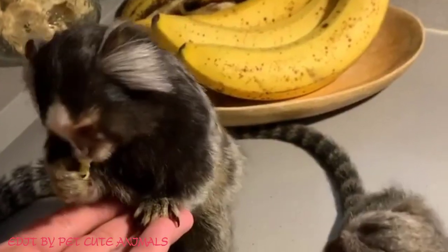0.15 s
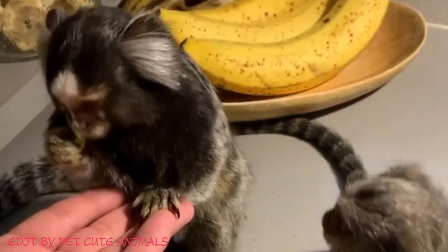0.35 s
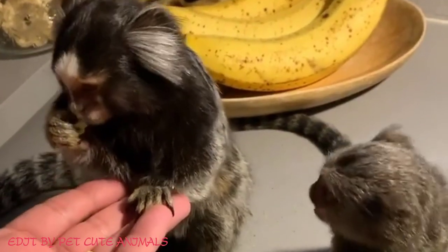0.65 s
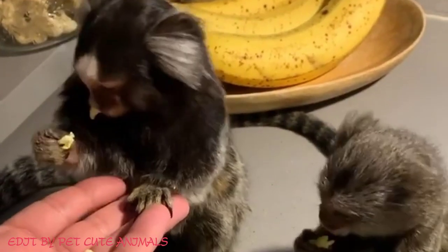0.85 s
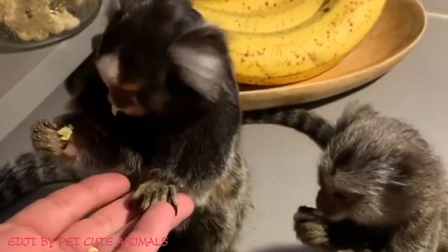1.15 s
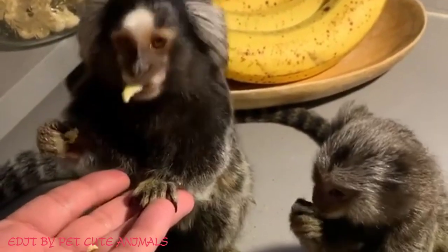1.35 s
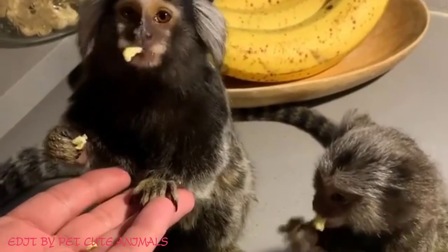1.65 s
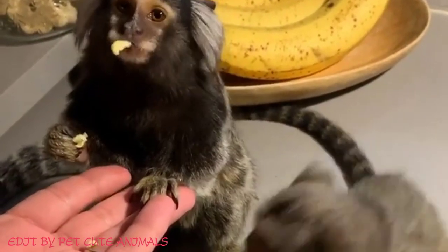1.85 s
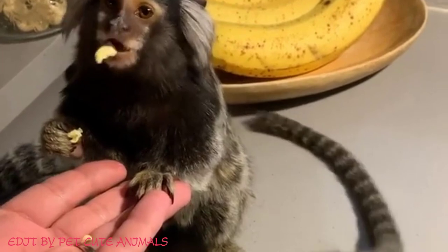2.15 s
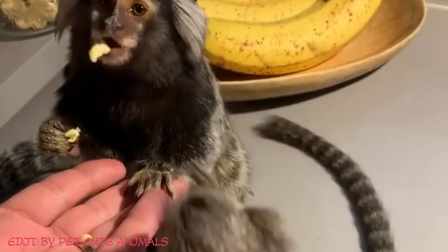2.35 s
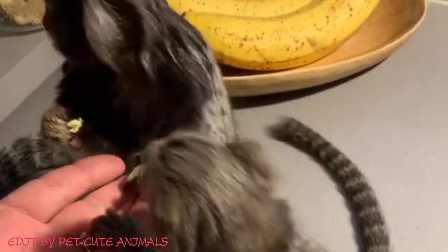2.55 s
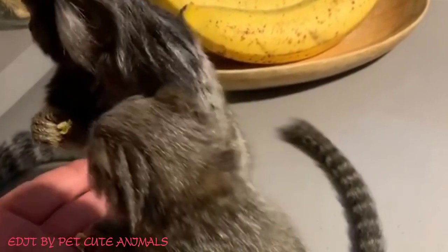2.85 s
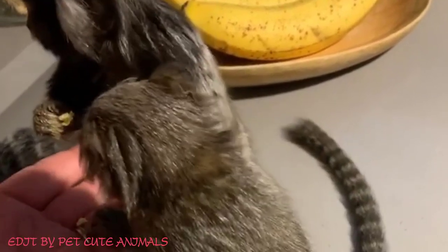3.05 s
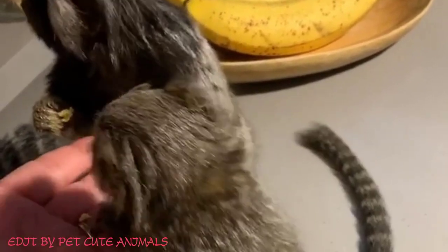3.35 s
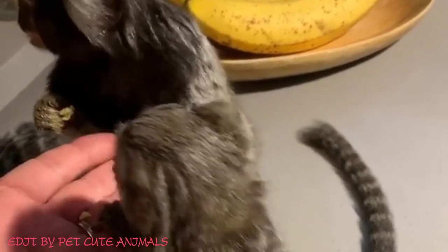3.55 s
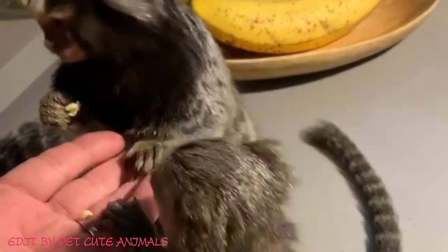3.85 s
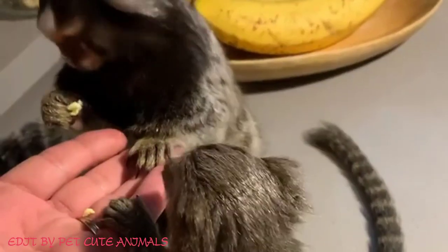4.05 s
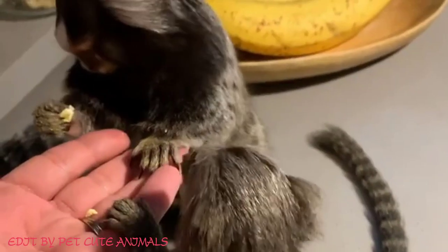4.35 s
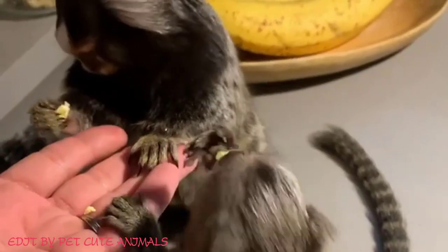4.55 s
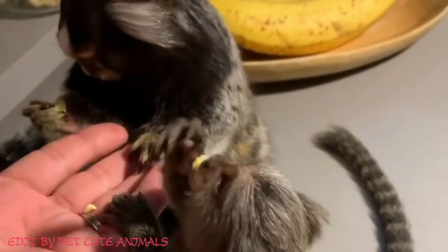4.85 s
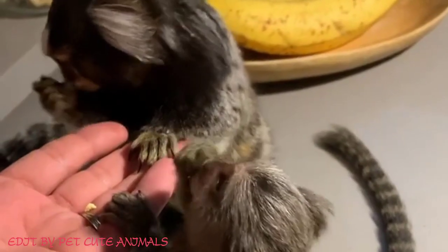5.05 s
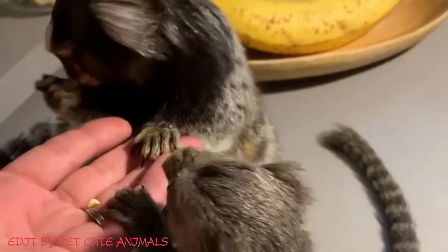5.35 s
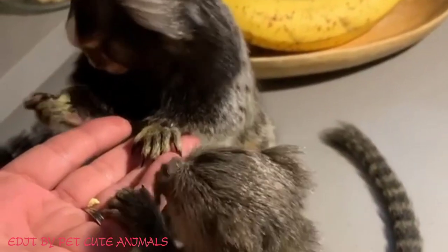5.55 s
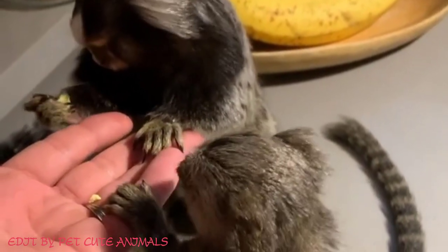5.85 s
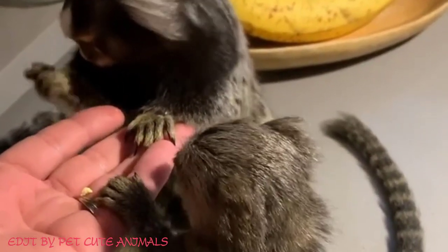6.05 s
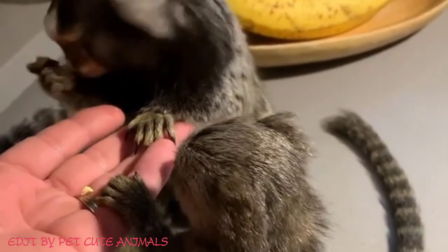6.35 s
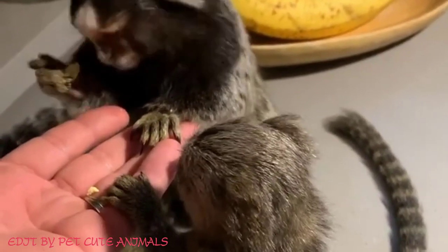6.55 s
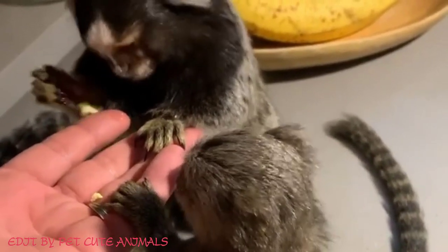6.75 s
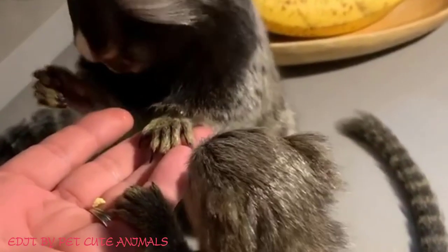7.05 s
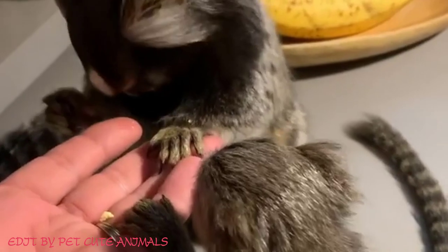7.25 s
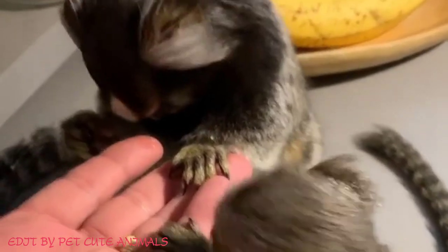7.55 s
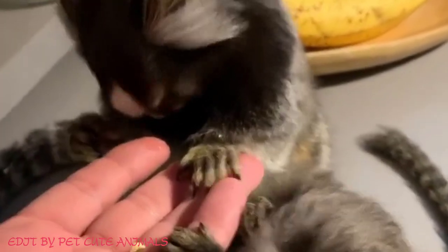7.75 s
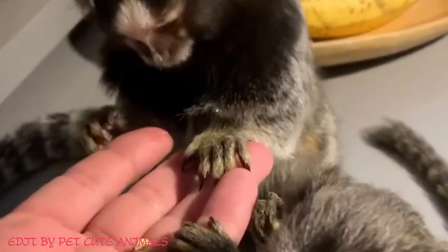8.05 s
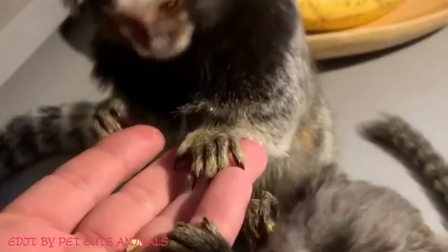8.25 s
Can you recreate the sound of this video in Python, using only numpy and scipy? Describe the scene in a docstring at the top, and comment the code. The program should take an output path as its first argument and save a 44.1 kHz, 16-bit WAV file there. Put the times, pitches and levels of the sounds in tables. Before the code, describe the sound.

A close stereo microphone in a small kitchen catches two tiny monkeys eating. Irregular chewing runs throughout: delicate noisy clicks, moist lip smacks, faint squelches and dry, crisp snaps, the sharpest snap near 4.4 s. Beneath lie a low, wavering appliance hum, a very faint motor whine, soft rumble and airy rushing, with a hollow drone that fades. At about 0.45 s comes a short, extremely high whistle, its pitch fluttering rapidly around 8 to 10 kHz. At 2.2 s a quick soft, hollow thump shakes the counter, followed at once by a stronger warbling chirp at 2.3 s and a longer, weaker one at 2.75 s. A very brief chirp sounds at 4.0 s. Chewing then continues alone until a final broken, slightly raspy chirp at 7.45 s, and smacks and ticks carry on to the end around 8.4 s.

```python
"""Marmosets eating in a kitchen

Two marmosets eat from a hand on a kitchen counter, close to the microphone.
Five very high chirps, whistles with a quickly swinging pitch, sound over chewing made of tiny noisy clicks.
Short pushes make the counter ring as a hop thumps it. An appliance hums and whines faintly with slowly
wavering sine tones, and filtered noise makes the rumble, rushing, air and hollow drone of the room."""
import sys
import numpy as np
from scipy import signal
from scipy.fft import rfft, irfft, next_fast_len
from scipy.io import wavfile
from scipy.ndimage import uniform_filter1d, map_coordinates

SR = 44100
rng = np.random.default_rng(int(sys.argv[2]) if len(sys.argv) > 2 else 0)


def master(y):
    """Save y as 16-bit WAV."""
    cut = np.clip(np.atleast_2d(y).T, -1, 1)
    pcm = np.round(cut * 32767)  # scale
    wavfile.write(sys.argv[1], SR, pcm.astype(np.int16))


N = 370881
TIME = np.arange(N) / SR
LEAD_S = .04  # a smack, squelch or scuff builds up for this long before its release


def from_db(db):
    """Turn decibels into a gain."""
    return 10 ** (np.asarray(db) / 20)


def rms_one(x):
    """Scale a sound to an average power of 1."""
    return x / np.sqrt(np.mean(x ** 2) + 1e-20)


def in_time(rows):
    """Join (seconds, value) rows by straight lines."""
    return np.interp(TIME, *np.transpose(rows))


def at_hz(points, hz):
    """Read a (Hz, value) table between its rows, on a log-frequency axis."""
    known, values = np.transpose(points)
    return np.interp(np.log(np.maximum(hz, 1)), np.log(known), values)


def drift(rate):
    """Smooth random wandering with spread 1; a higher rate (per second) wanders faster."""
    knots = signal.resample_poly(rng.standard_normal(int(N / SR * rate) + 8), 8, 1)
    return rms_one(np.interp(TIME * rate * 8, np.arange(len(knots)), knots))


def resonance(x, hz, width):
    """Ring at one pitch, as a hollow space does: a two-pole filter with gain 1 on top."""
    r = np.exp(-np.pi * width / SR)
    feedforward = np.array([1, 0, -1]) * (1 - r * r) / 2
    feedback = [1, -2 * r * np.cos(2 * np.pi * hz / SR), r * r]
    return signal.lfilter(feedforward, feedback, x + 1e-18)


def butterworth(x, order, hz, kind):
    """Keep only the low, high or middle (band) part of a sound."""
    return signal.sosfilt(signal.butter(order, hz, kind, fs=SR, output="sos"), x)


def add(track, s, sound):
    """Mix a short sound in at time s."""
    start = int(np.clip(s * SR, 0, N - 1))
    track[start:start + len(sound)] += sound[:N - start]


def chirp_pitch(t, s, pitch):
    """The whistle's pitch (Hz) swings smoothly between the troughs and tops of its warble."""
    top_sharpness = 1.45  # above 1: broad troughs, quick tops
    leg = np.clip(np.searchsorted(s, t, "right") - 1, 0, len(s) - 2)
    step = np.diff(pitch)[leg]
    progress = (t - s[leg]) / np.diff(s)[leg]
    height = .5 - .5 * np.sign(step) * np.cos(np.pi * progress)
    return np.minimum(pitch[leg], pitch[leg + 1]) + np.abs(step) * height ** top_sharpness


def chirps(jitter_hz, shimmer_db, rasp_hz):
    """A nearly pure whistle warbles and breaks off; in a rasp a second, slow vibration chops it into pulses."""
    # One list per chirp, the troughs and tops of its warble.
    # Each row: time in seconds, pitch in Hz, level in dB.
    warbles = [
        [(.434, 9400, -32), (.439, 9280, -30), (.451, 10100, -31), (.471, 8550, -28), (.488, 9700, -33),
         (.504, 7850, -35), (.522, 9400, -34), (.547, 7800, -43), (.564, 8600, -51)],
        [(2.296, 9300, -34), (2.301, 8950, -31), (2.315, 10500, -28.5), (2.334, 8400, -23.5),
         (2.351, 10900, -31), (2.369, 8400, -26), (2.386, 10100, -30), (2.413, 8050, -23), (2.429, 9600, -31),
         (2.452, 7550, -30), (2.469, 8250, -32), (2.476, 8100, -29.5)],
        [(2.746, 7900, -39), (2.757, 7780, -35), (2.769, 9500, -34), (2.788, 7780, -33), (2.808, 9650, -31.5),
         (2.827, 7750, -35), (2.846, 9600, -33), (2.868, 7750, -33), (2.889, 8900, -31), (2.911, 7620, -33),
         (2.930, 8180, -31.5), (2.949, 7850, -33)],
        [(3.971, 9560, -29), (3.982, 9520, -24.5), (4.006, 8900, -31), (4.018, 8950, -27.5),
         (4.033, 8300, -25.5), (4.042, 9300, -31)],
        [(7.438, 9250, -41), (7.453, 10300, -37), (7.469, 8900, -31), (7.485, 10800, -26), (7.508, 8250, -26),
         (7.526, 9600, -24), (7.555, 7550, -35), (7.570, 8750, -30)],
    ]
    # The voice breaks into a rasp. Each row: middle in seconds, half length in seconds, pitch swing in Hz.
    rasps = [(2.378, .005, 550), (4.037, .004, 280), (7.519, .005, 450)]
    # The voice drops out briefly, often near a top of the warble.
    # Each row: start in seconds, end in seconds.
    breaks = [(.486, .493), (.517, .544), (2.346, 2.359), (2.383, 2.399), (2.773, 2.780), (2.849, 2.853),
              (4.020, 4.029), (7.447, 7.461), (7.479, 7.496), (7.523, 7.535)]
    rasp_db, break_db = 5, 22  # a rasp is pressed out louder; a break drops the voice
    accent_db, accent_s = 4, .006  # after a break the voice comes back with a push
    attack_s = .002  # the voice starts and stops this quickly

    bells = [np.exp(-((TIME - s) / half) ** 2) for s, half, swing in rasps]
    rasp = sum(bells)
    flutter = np.sin(2 * np.pi * rasp_hz * TIME + drift(300))
    swing_hz = sum(bell * row[2] for bell, row in zip(bells, rasps))
    shake_hz = flutter * swing_hz + jitter_hz * drift(900)
    pulsing = 1 - np.minimum(2 * rasp, 1) * (1 - flutter) / 2

    silent = sum(1.0 * ((TIME > a) & (TIME < b)) for a, b in breaks)
    broken = uniform_filter1d(silent, int(attack_s * SR))
    accent = sum((TIME > b) * np.exp(-np.abs(TIME - b) / accent_s) for a, b in breaks)
    effort_db = rasp_db * rasp + accent_db * accent + shimmer_db * drift(360) - break_db * broken

    out = np.zeros(N)
    for turns in warbles:
        s, pitch, level_db = np.transpose(turns)
        t = np.arange(s[0], s[-1], 1 / SR)
        span = int(s[0] * SR) + np.arange(len(t))
        hz = chirp_pitch(t, s, pitch) + shake_hz[span]
        edge = np.clip(np.minimum(t - s[0], s[-1] - t) / attack_s, 0, 1)
        envelope = np.sin(np.pi / 2 * edge) ** 2
        gain = envelope * pulsing[span] * from_db(np.interp(t, s, level_db) + effort_db[span])
        out[span] += np.sqrt(2) * gain * np.sin(2 * np.pi * np.cumsum(hz) / SR)
    return out


def chewing(bite_db, crisp_db, mouth_top_hz):
    """Smacks ring in the mouth, dry ones with a click, moist ones as a soft swell; food snaps and squelches."""
    # The louder lip smacks and bites. Each row: release in seconds, level in dB before bite_db,
    # treble against middle in dB before crisp_db and bite_db, moistness (stretches the smack).
    bites = [(0.149, -44, -9, 1.23), (0.5197, -44.5, -11, 0.87), (0.6175, -54, -15, 0.64),
             (1.2088, -38.5, -12, 0.84), (1.245, -50, -8, 2.9), (1.3125, -48, -7, 0.47),
             (1.372, -48, -14, 0.28), (1.652, -54, -13, 0.71), (1.9751, -42, -17, 0.6),
             (2.0225, -47, -13, 1.7), (2.204, -44, -8, 0.99), (2.2408, -38, -3.5, 0.28),
             (3.148, -44.5, -4, 0.73), (3.205, -45.5, -7, 0.82), (4.299, -47, -13.5, 2),
             (4.4115, -43.5, -12, 1.06), (4.554, -45.5, -19, 1.9), (5.0873, -50, -13, 0.28),
             (5.179, -46, -14, 1.8), (5.5047, -47, -14, 0.9), (5.7737, -46, -21, 1),
             (5.859, -50, -2.5, 1.1), (5.9306, -47.5, 4, 0.76), (6.152, -53, -16, 1),
             (6.440, -47, -17, 0.9), (6.4906, -46, -5.5, 0.88), (6.7172, -48, -6.5, 1.2),
             (6.7812, -43.5, -3.5, 0.73), (7.0005, -41, -17, 0.63), (7.5623, -42.5, -17, 3.4),
             (7.916, -54, -18, 1.1), (7.9728, -43.5, -11, 0.23), (8.051, -53, 0, 0.28),
             (8.121, -47, -9, 0.9), (8.206, -54, 2, 0.55), (8.3225, -44.5, -5.5, 1.3)]
    # Saliva squelches between the teeth. Each row: middle in seconds, level in dB.
    squelches = [(.82, -60.5), (1.111, -70), (1.226, -45.5), (1.421, -61), (4.76, -56), (6.89, -63),
                 (6.93, -59.5), (7.003, -48.5), (7.639, -64), (7.846, -48), (8.29, -54.5)]
    # Crisp food snaps. Each row: release in seconds, level in dB.
    snaps = [(0.896, -44), (1.482, -40), (1.519, -47), (1.898, -39.5), (2.127, -38.5), (2.524, -36),
             (3.776, -39.5), (3.851, -44.5), (3.906, -39.5), (4.096, -43), (4.36, -27.5), (4.745, -41),
             (4.86, -42), (4.941, -38), (7.906, -36), (8.199, -38)]
    # faint chewing at random times among the bites, levels before bite_db
    nibbles_per_s, nibble_db, nibble_spread_db = 20, -60, 7
    soften_db = 6  # moisture cushions the release click by this much per unit

    wet, crisp = np.zeros(N), np.zeros(N)
    chances = rng.random((300, 5))
    share = nibbles_per_s * N / SR / len(chances)
    nibbles = [(when * N / SR, nibble_db + nibble_spread_db * size, -18 + 16 * bright, .5 + moist)
               for when, chance, size, bright, moist in chances if chance < share]
    for s, level, treble, moist in list(bites) + nibbles:
        moist = np.clip(moist, .3, 2.5)
        click_db = soften_db * (.5 - moist)
        burst = crackle(smear_db=-10, rise_s=.008 * moist, fall_s=.015 * moist, click_db=click_db)
        smack = gliding(mouth(burst, gape_spread=.04, colour_db=2.5))
        add(wet, s - LEAD_S, from_db(level + bite_db) * smack)
        add(crisp, s - LEAD_S, from_db(level + treble + crisp_db) * burst)
    for s, level in squelches:
        add(wet, s - LEAD_S, from_db(level) * squelch())
    for s, level in snaps:
        add(crisp, s - LEAD_S, from_db(level) * crackle(smear_db=-13, rise_s=.005, fall_s=.011))
    wet = butterworth(wet, 3, mouth_top_hz, "low")
    return wet + resonance(crisp, 10500, 3200) + from_db(-9.5) * resonance(crisp, 8700, 2200)


def crackle(smear_db, rise_s, fall_s, click_db=0):
    """One click at LEAD_S and its short ring, inside a flurry of tiny uneven ticks that builds and dies away."""
    ticks_per_s, tick_s, tick_spread_db = 420, .00025, 6  # tiny fractures around the release
    release_db, ring_db, ring_t60_s = 4.5, -6, .009  # release click and its ring, before click_db
    t = TIME[:SR // 7] - LEAD_S
    noise, sizes = rng.standard_normal((2, len(t)))
    ticks = (rng.random(len(t)) < ticks_per_s / SR) * from_db(tick_spread_db * np.minimum(sizes, 1))
    grains = .6 + 2.6 * signal.lfilter([1], [1, -np.exp(-1 / (tick_s * SR))], ticks)
    smear = from_db(smear_db) * np.exp(np.minimum(t / rise_s, -t / fall_s))
    ring = from_db(ring_db - 60 * np.abs(t) / ring_t60_s)
    click = from_db(release_db) * np.exp(-np.abs(t) / tick_s)
    release = (t >= 0) * (ring + click)
    return noise * (from_db(click_db) * release + grains * smear)


def mouth(burst, gape_spread, colour_db):
    """Air in the mouth rings at several pitches; its size and colour are drawn anew for each smack."""
    # The mouth's resonances. Each row: pitch in Hz before the random size, width in Hz,
    # level in dB before the random colour.
    resonances = [(1730, 820, -6), (3226, 680, 0), (4050, 670, 0), (5325, 560, -1.5), (6730, 1130, -1)]
    size = np.exp(gape_spread * np.clip(rng.standard_normal(), -2, 2))
    gains = rms_one(from_db(colour_db * rng.standard_normal(len(resonances))))
    return sum((-1) ** k * gains[k] * from_db(db) * resonance(burst, hz * size, width)
               for k, (hz, width, db) in enumerate(resonances))


def gliding(sound):
    """The jaw moves, so the pitch of a mouth sound slides up or down around its release."""
    glide_per_s = 2.5  # fastest slide, as a share of the pitch
    t = TIME[:len(sound)]
    warped = t + rng.uniform(-1, 1) * glide_per_s * (t - LEAD_S) ** 2 / 2
    return map_coordinates(sound, [warped * SR])


def squelch():
    """A soft, clickless fizz swells and fades in a narrow gap of the mouth; rms about 1 at its height."""
    high_hz, low_hz, width_hz = 6450, 3330, 490  # pitches before the random shift
    low_db, swell_s = -12.5, .0058  # the mouth's lower resonance answers too
    t = TIME[:SR // 7] - LEAD_S
    shift = width_hz * rng.uniform(-0.59, 0.6)

    def fizz(hz):
        """Noise rings in two resonances in a row, a narrow and a wide one."""
        narrow = resonance(rng.standard_normal(len(t)), hz + shift, width_hz)
        return rms_one(resonance(narrow, hz + shift, 2 * width_hz))

    both = fizz(high_hz) + from_db(low_db) * fizz(low_hz)
    return gliding(both) * np.exp(-np.abs(t) / swell_s)


def footfalls(scuff_db):
    """Soft feet push the counter top; longer contacts wake only its low modes, and fur and claws scuff."""
    # Feet on the counter. Each row: landing in seconds, level of the push in dB, contact time in seconds.
    steps = [(0.149, -40.5, 0.0066), (1.986, -41.5, 0.0018), (2.031, -45, 0.002), (2.215, -36, 0.0044),
             (2.241, -34.5, 0.0015), (2.252, -22.5, 0.0037), (2.266, -27.5, 0.0045),
             (3.150, -54.5, 0.00076)]
    # Ringing modes of the counter top. Each row: pitch in Hz, level in dB, time to fall by 60 dB in seconds.
    modes = [(50, -12, 0.22), (74, -3.5, 0.21), (102, -0.5, 0.12), (128, -7, 0.1), (162, -2.5, 0.24),
             (254.5, -7.5, 0.13), (310, -16, 0.044), (390, -20, 0.053), (530, -3, 0.021), (803, 4, 0.033)]
    # the crowd of weaker modes of counter and cabinet
    shudder_db, shudder_t60_s, shudder_top_hz = -4, .26, 520

    push, scuff, t = np.zeros(N), np.zeros(N), TIME[:SR // 2]
    hardest = min(contact for s, level, contact in steps)  # brief contacts scuff most
    for s, level, contact in steps:
        pulse = np.sin(np.pi * np.minimum(t / contact, 1))
        add(push, s, from_db(level) * pulse / pulse.sum())
        scrape = crackle(smear_db=-2.0, rise_s=0.0094, fall_s=0.017)
        add(scuff, s - LEAD_S, from_db(level + scuff_db) * hardest / contact * scrape)
    body = sum(from_db(db - 60 * t / t60) * np.cos(2 * np.pi * hz * t) for hz, db, t60 in modes)
    crowd = rms_one(butterworth(rng.standard_normal(len(t)), 2, [modes[1][0], shudder_top_hz], "band"))
    body = body + crowd * from_db(shudder_db - 60 * t / shudder_t60_s)
    body = butterworth(body, 2, 34, "high")  # the counter radiates little below 34 Hz
    return -signal.fftconvolve(push, body)[:N] + resonance(scuff, 460, 380)


def kitchen(x, wet_db, t60, tail_db=-20, tail_t60=0.15):
    """Direct sound at two microphone ports, dense echoes off counter and bodies, and a faint room tail."""
    # How the direct sound differs between the ports. Each row: pitch in Hz, lead of the left in radians.
    port_phase = [(0, -5.5), (2400, 4.5), (3500, 2), (4600, 3), (6200, 7), (8300, 8.5), (10800, 12),
                  (11700, 13.5), (13000, 9)]
    size = next_fast_len(N + SR)
    hz = np.fft.rfftfreq(size, 1 / SR)
    t = TIME[:SR // 2]
    decay = from_db(-60 * t / t60) + from_db(tail_db - 60 * t / tail_t60)
    decay = decay * (t > .0015)  # the first echo needs a moment to arrive
    echoes = rng.standard_normal((2, len(t))) * decay / np.sqrt(np.sum(decay ** 2))
    ports = np.exp(-1j * np.interp(hz, *np.transpose(port_phase)) * [[0], [1]])
    return irfft(rfft(x, size) * (ports + from_db(wet_db) * rfft(echoes, size)), size)[:, :N]


def appliance(waver):
    """Mains hum with unsteady overtones, and thin motor tones that reach each port in their own phase."""
    # Level of the mains hum. Each row: time in seconds, level in dB before a slight waver.
    hum_level = [(0.0, -45.5), (0.28, -48.5), (0.89, -47.5), (1.43, -50), (2.2, -52), (2.36, -59),
                 (2.55, -51.5), (2.69, -53.5), (3.23, -51.5), (3.63, -46.5), (4.14, -48), (4.5, -43.5),
                 (4.94, -49), (5.32, -45.5), (7.33, -52), (7.64, -55.5), (7.99, -49.5), (8.41, -51.5)]
    # Parts of the hum. Each row: multiple of the hum's pitch, level in dB against the hum level.
    hum_orders = [(1, 1), (2, -16), (3, -22.5), (5, -22.5)]
    # Motor tones. Each row: pitch in Hz, level in dB before fade and waver.
    motor_tones = [(442.5, -73.5), (886.5, -75.5), (1108, -75.5)]
    # Slow fade of the motor tones. Each row: time in seconds, change in dB.
    whine_fade = [(0, -1), (4.5, -0.5), (7.3, -2), (8, -17.5)]
    # One more tone that sings up late. Each row: time in seconds, level in dB before waver.
    singing = [(0, -104), (7.1, -84), (7.5, -76.5), (8.41, -72)]
    hum_hz, singing_hz, whine_waver_db = 58.93, 1330, 2.5

    phase = 2 * np.pi * hum_hz * TIME
    hum = sum(from_db(db) * np.sin(round(k) * phase + waver * (k - 1) * drift(7)) for k, db in hum_orders)
    tones = [(hz, db + in_time(whine_fade)) for hz, db in motor_tones]
    tones = tones + [(singing_hz, in_time(singing))]
    whine = 0
    for hz, db in tones:
        gain = from_db(db + whine_waver_db * drift(18))
        port_offset = np.array([[0], [1.1]])  # radians, left and right
        whine = whine + gain * np.sin(2 * np.pi * hz * TIME + 1.4 * drift(9) + port_offset)
    return np.sqrt(2) * (from_db(in_time(hum_level) + 0.45 * drift(6.4)) * hum + whine)


def diffuse_noise(colour):
    """Stereo noise arriving from all around, rms 1: left and right are alike at some pitches, not at others."""
    # Each row: pitch in Hz, left-right likeness (held between -1 opposite and 1 the same).
    likeness = [(60, 0.87), (130, 0.95), (280, 0.54), (600, -0.38), (1300, -0.35), (2800, 0.37),
                (4600, -1.27), (6800, 1), (9000, -1.21), (11200, 0.9), (13000, -1.3)]
    size = next_fast_len(N)
    hz = np.fft.rfftfreq(size, 1 / SR)
    mid, side = rfft(rng.standard_normal((2, size)))
    alike = np.clip(at_hz(likeness, hz), -1, 1)
    pair = np.sqrt(1 + alike) * mid + np.sqrt(1 - alike) * side * [[1], [-1]]
    return rms_one(irfft(pair * from_db(at_hz(colour, hz)), size)[:, :N])


def rumble():
    """Low noise with an unsteady level rumbles in the room."""
    # Each row: time in seconds, level in dB before the 11 dB lift below.
    level = [(0, -62), (.35, -78.5), (.6, -68.5), (2.1, -70), (2.5, -66), (3.3, -67), (8.41, -67.5)]
    # Each row: pitch in Hz, relative strength in dB per Hz.
    colour = [(25, -14.5), (42, 6), (80, 4.5), (125, 3), (200, -4.5), (300, -1.5), (430, -14), (700, -19.5),
              (1100, -18.5), (1600, -36.5), (3000, -55.5)]
    return from_db(in_time(level) + 11.0 + 2.86 * drift(10)) * diffuse_noise(colour)


def rush():
    """A soft rushing noise swells and sinks."""
    # Each row: time in seconds, level in dB before its random wandering.
    level = [(0, -60.5), (.35, -65), (.6, -63), (1.65, -58.5), (2.1, -65.5), (3.4, -74.5), (4.5, -62.5),
             (5, -70.5), (7.2, -72), (7.6, -74)]
    # Each row: pitch in Hz, relative strength in dB per Hz.
    colour = [(150, -35.5), (300, 0.5), (700, 5), (1100, -9), (2000, -54), (5000, -42)]
    return from_db(in_time(level) + 2.6 * drift(12)) * diffuse_noise(colour)


def drone():
    """Noise through a narrow resonance near five times the hum's pitch: a hollow drone that dies down."""
    # Each row: time in seconds, level in dB.
    level = [(0, -62), (1.6, -59), (2.6, -67.5), (8.41, -74)]
    hollow = resonance(rng.standard_normal(N), hz=298.1, width=18)
    return from_db(in_time(level)) * rms_one(hollow)


def air():
    """Faint, airy noise with a wandering level."""
    # Each row: pitch in Hz, relative strength in dB per Hz.
    colour = [(700, 0), (1500, 4.5), (2500, -6), (4400, 6), (6000, -3), (8000, 2), (12500, -2),
              (15000, -33)]
    return from_db(-69.0 + 3.5 * drift(15)) * diffuse_noise(colour)


def scene():
    """The animals close by, the appliance and the room behind them."""
    whistle = chirps(jitter_hz=55, shimmer_db=1.8, rasp_hz=680)
    whistle = from_db(-0.6) * butterworth(whistle, 4, (7300, 10900), "band")  # the throat passes only this
    voice = kitchen(whistle, wet_db=-5.5, t60=.08, tail_db=-25, tail_t60=.2)
    eating = kitchen(chewing(bite_db=8.0, crisp_db=9.5, mouth_top_hz=8470), wet_db=-4.5, t60=0.094)
    hops = footfalls(scuff_db=5.0)
    left_right_db = [[-.7], [.7]]
    room = (rumble() + rush() + drone()) * from_db(left_right_db) + air()
    return voice + eating + hops + appliance(waver=0.6) + room


def record(dry):
    """The top is cut steeply above 13400 Hz."""
    return signal.sosfilt(signal.ellip(10, .2, 70, 13400, fs=SR, output="sos"), dry)


dry = scene()
out = record(dry)
master(out)
```